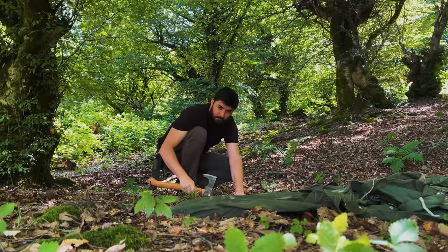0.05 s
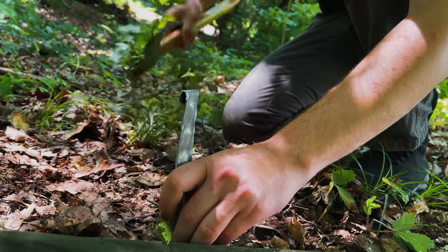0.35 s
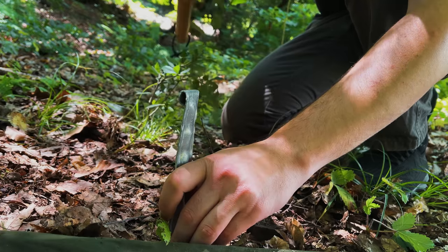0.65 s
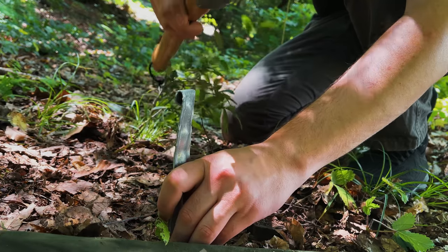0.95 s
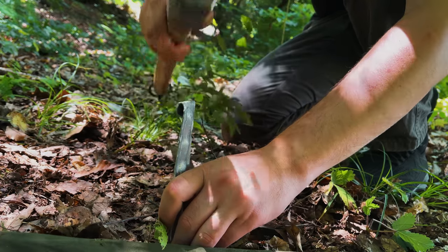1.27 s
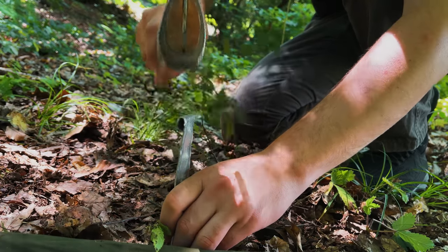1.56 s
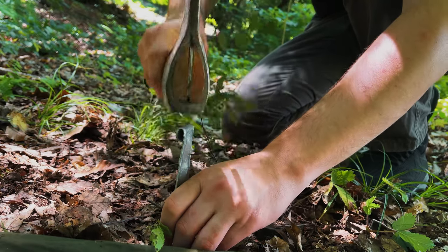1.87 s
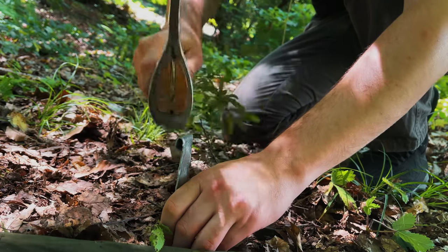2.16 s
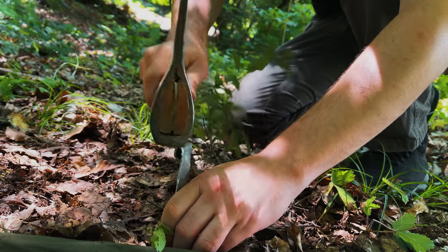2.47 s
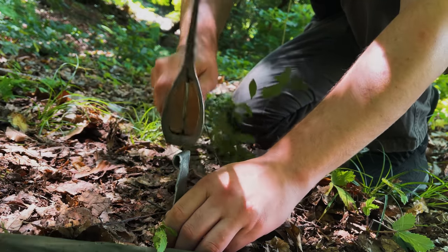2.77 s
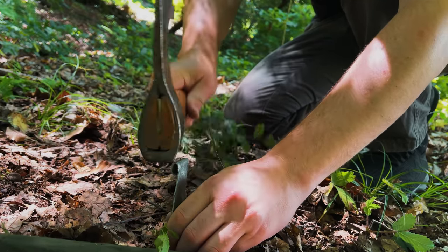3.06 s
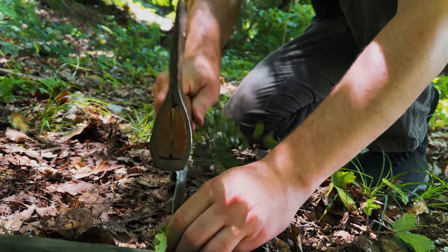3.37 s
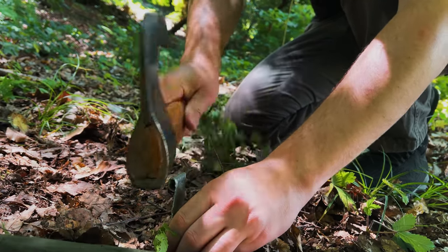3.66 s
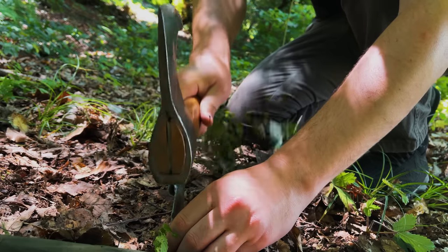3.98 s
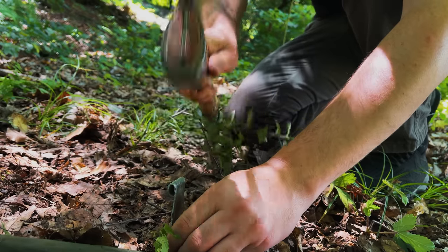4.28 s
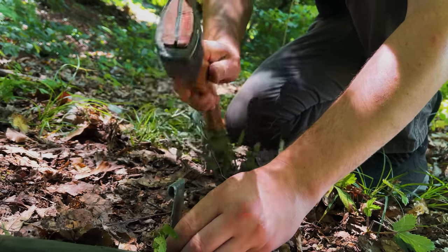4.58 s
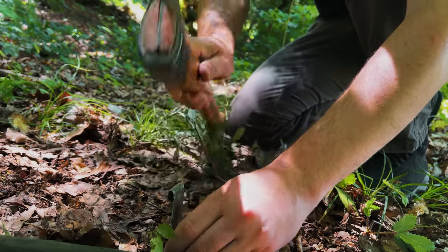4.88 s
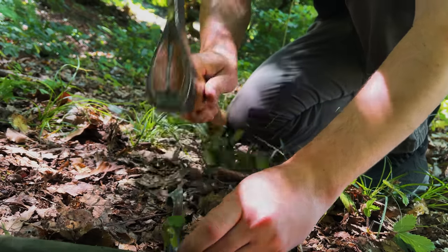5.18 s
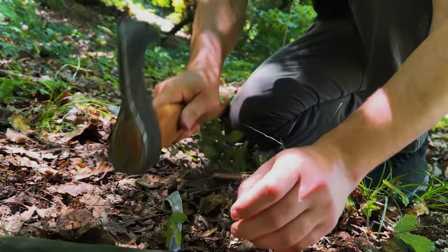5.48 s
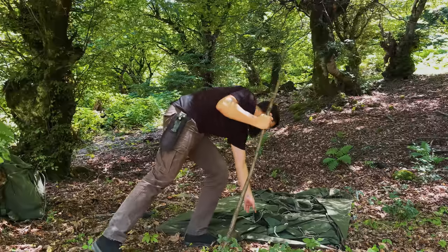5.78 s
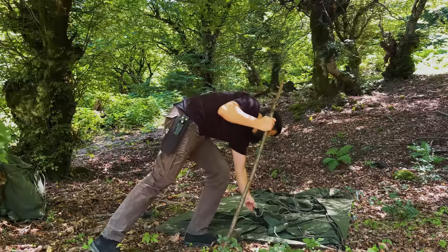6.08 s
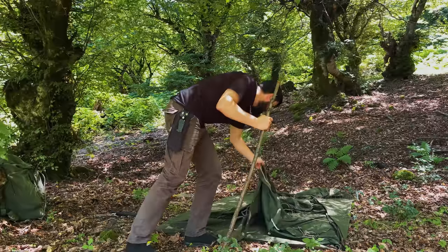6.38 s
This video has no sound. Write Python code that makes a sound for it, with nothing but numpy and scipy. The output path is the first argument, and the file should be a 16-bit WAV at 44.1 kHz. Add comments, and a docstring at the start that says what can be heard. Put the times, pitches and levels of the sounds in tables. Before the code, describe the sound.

An axe hammers a steel tent stake into soil with sharp clinks and thuds, amid droning cicadas and faint forest birds.

```python
"""Cicadas drone in a forest, a far bird whistles and dry leaves crackle. From 1.1 s the back of an axe drives a
steel tent stake into the soil with fourteen quick blows, each a bright clink and a falling thud. The background
dips after each blow, deeply at first. As the stake sinks the ground booms more, and the axe sometimes lands
twice. With the last blow, at 5.3 s, the background drone jumps louder; more birds call, and at the end a tarp
is dragged up, rustling and snapping."""
import sys
import numpy as np
from scipy import signal
from scipy.fft import rfft, irfft
from scipy.io import wavfile
from scipy.ndimage import uniform_filter1d

SR = 44100
rng = np.random.default_rng(int(sys.argv[2]) if len(sys.argv) > 2 else 0)


def unload_audio(sound):
    """Save the sound as a 16-bit wav file, at the path given as the first command line argument."""
    columns = np.transpose(np.atleast_2d(sound))
    # keep every value between -1 and 1, then stretch to whole-number steps
    steps = np.round(np.clip(columns, -1, 1) * 32767)
    wavfile.write(sys.argv[1], SR, steps.astype(np.int16))


N = 292824
HZ = np.fft.rfftfreq(4096, 1 / SR)

# Axe blows. Each row: start in seconds, then strike, thud and stake ring levels in dB.
BLOWS = [(1.1378, -20, -9, -54), (1.483, -19.5, -34, -56.5), (1.8099, -20.5, -27.5, -61),
         (2.12, -20.5, -25, -70), (2.443, -19.5, -22.5, -39), (2.761, -19, -20.5, -52),
         (3.0614, -21.5, -23, -51), (3.361, -19, -21.5, -40), (3.6543, -16.5, -19, -30.5),
         (3.958, -18, -21, -41.5), (4.4094, -20.5, -20.5, -35), (4.7303, -17, -19, -31.5),
         (5.055, -21, -20.5, -36.5), (5.3455, -22.5, -19, -30)]
# Light touches of axe on stake. Each row: start in seconds, level in dB.
TAPS = [(1.87, -41), (2.31, -53.5), (3.409, -31), (3.543, -43.5), (4.004, -31.5), (4.786, -31.5),
        (5.006, -45.5), (5.104, -30.5)]
# Steel-on-steel spectrum. Each row: frequency in Hz, relative level in dB.
CLINK_SPECTRUM = [(3000, -25), (8500, -11.5), (9100, -10), (9800, 7), (10200, -17), (10700, -1),
                  (11400, -3.5), (12500, -15.5), (13900, -21.5), (14400, -47), (15100, -13.5), (15700, -25),
                  (16300, -26.5)]
# Axe head modes. Each row: frequency in Hz, level re the strike in dB, T60 in seconds.
AXE_MODES = [(1980, -30.5, .13), (2550, -29, .05), (9815, -22, .17)]
# Modes of the hand-damped stake. Each row: frequency in Hz, relative level in dB, T60 in seconds.
STAKE_MODES = [(4260, -14, .11), (4640, -2, .065), (7612, 1.5, .09), (9040, -4, .08), (11910, -4, .08)]

def steel():
    """Axe on stake: a crack, a clink and a short ring for each blow; light taps only click."""
    out = np.zeros(N)
    bright = causal(amp(spectrum_at(CLINK_SPECTRUM, HZ)))
    for s, strike_db, _, ring_db in BLOWS:
        tall = 1 - ease(s, half_s=1.67, spread_s=0.11)  # 1 while the stake stands tall
        half_sunk = np.sin(np.pi * grip(s))
        crack_db = strike_db + between((-12, -11), tall) + 5.5 * half_sunk
        add(out, s, amp(crack_db) * contact(body_colour(tall), chatter=1.0))
        add(out, s - .0002, amp(strike_db) * contact(bright, chatter=0.27))
        add(out, s, amp(strike_db - 10.5 * tall) * ringing(AXE_MODES))
        add(out, s, amp(ring_db) * ringing(STAKE_MODES))
    dull = causal(HZ / (HZ + 200) / (1 + HZ / 2500) / (1 + (HZ / 4400) ** 10))
    for s, db in TAPS:
        add(out, s, amp(db - 14) * contact(dull, chatter=0.38, chatter_s=0.0035))
    return out

# Head and stake resonances. Each row: centre in Hz, width in Hz, level in dB, extra dB when tall.
BODY_RESONANCES = [(1420, 400, 0, -3), (2050, 220, -5, 2), (2570, 260, -1, 0), (2930, 320, -2, 3),
                   (3800, 450, -6, 3), (4720, 260, -1, 17), (6100, 550, 1, 11), (7650, 300, 2, 6),
                   (8150, 350, -2, 6)]

def body_colour(tall):
    """Impulse response of head and stake: broad resonances with hollows between them."""
    modes = sum(amp(db + tall * extra_db) / (1 + 2j * (HZ - hz) / width_hz)
                for hz, width_hz, db, extra_db in BODY_RESONANCES)
    hollows = amp(-8 - 4 * tall)
    return causal(abs(modes + hollows) * HZ / (HZ + 700) / (1 + (HZ / 9000) ** 14))

def contact(colour, chatter, rise_s=0.00055, chatter_s=0.0054):
    """One sharp contact and a few milliseconds of chatter, through the impulse response colour."""
    t = np.arange(512) / SR
    force = t / rise_s * np.exp(1 - t / rise_s)
    force += chatter * np.exp(-(t / chatter_s) ** 4) * np.minimum(t / rise_s, 1)
    grit = rfft(force * rng.standard_normal(len(t)))
    grit /= np.sqrt(abs(grit) + 1e-9)  # a hard contact excites all pitches nearly alike
    hit = signal.fftconvolve(irfft(grit) * np.exp(-(t / (2 * chatter_s)) ** 4), colour)
    return hit / np.sqrt(np.sum(hit ** 2) / (.01 * SR) + 1e-20)  # energy of 10 ms at rms 1

def ringing(modes):
    """Dying sines; each blow lands a little differently and shares its energy anew."""
    t = np.arange(SR // 4) / SR
    return sum(amp(db + rng.uniform(-3, 3) - 60 * t / t60_s) * np.sin(2 * np.pi * hz * t)
               for hz, db, t60_s in modes)

# Soft thumps on the soil. Each row: start in seconds, level in dB.
THUMPS = [(0.163, -50), (0.271, -53), (1.836, -34.5), (5.69, -37), (6.061, -39.5), (6.278, -47),
          (6.419, -36)]

def soil():
    """Each blow gives a thud, a short low knock of the soil and a boom; taps and thumps are softer."""
    out, t = np.zeros(N), np.arange(SR // 5) / SR
    thud_lag_s, soil_knock_lag_s, boom_lag_s = .0016, .0071, .0145
    soil_knock = (1 - np.exp(-t / 0.0047)) * np.exp(-t / 0.0069) * np.sin(2 * np.pi * 205 * t)
    for s, _, thud_db, _ in BLOWS:
        firm = grip(s)
        boom_db, ground_hz = between((-44, -15), firm), between((63.2, 75.4), firm ** 2)
        start_hz = 412 - 6.5 * (thud_db + 15.5)  # a harder shove starts lower
        decay_s = between((0.0067, 0.023), firm)
        add(out, s + thud_lag_s, thud(t, amp(thud_db), start_hz, decay_s))
        add(out, s + soil_knock_lag_s, amp(boom_db - 8.5) * soil_knock)
        add(out, s + boom_lag_s, amp(boom_db) * boom(t, ground_hz, swell_s=0.01))
    for s, db in TAPS:
        add(out, s + thud_lag_s, thud(t, amp(db - 1.5), start_hz=395, decay_s=0.0072))
        boom_db = -31.5 + 2 * (db + 32)  # light taps barely move the ground
        add(out, s, amp(boom_db) * boom(t, hz=83.3, swell_s=0.016))
    for s, db in THUMPS:
        add(out, s, amp(db) * boom(t, hz=88 * rng.uniform(0.82, 1.23), swell_s=.011))
    return out

def thud(t, force, start_hz, decay_s, rest_hz=72, fall_s=.004):
    """A push that falls in pitch as the soil yields; a hard one crushes it and adds an overtone."""
    phase = 2 * np.pi * np.cumsum(rest_hz + (start_hz - rest_hz) * np.exp(-t / fall_s)) / SR
    crush = force * 1.5 * np.exp(-t / 0.0029 - (t / 0.0059) ** 2) * np.cos(2 * phase)
    return -force * (1 - np.exp(-t / 0.0016)) * (np.exp(-t / decay_s) * np.sin(phase) + crush)

def boom(t, hz, swell_s):
    """The springy soil's vibration swells and dies within a few cycles."""
    envelope = t / swell_s * np.exp(1 - t / swell_s - (t / 0.043) ** 4)
    return envelope * np.sin(2 * np.pi * hz * t)

def grip(s):
    """The soil's hold on the stake at time s, from 0 (loose) to 1 (firm)."""
    return ease(s, half_s=2.59, spread_s=0.57)

def knocks():
    """The deeper the stake, the more of each blow the ground returns as a dull stereo knock."""
    out = np.zeros((2, N))
    colour = causal(1 / (1 + (480 / (HZ + 1)) ** 3) / (1 + (HZ / 1150) ** 6))
    for s, *_ in BLOWS:
        gain = amp(between((-64, -36.5), grip(s)))
        for channel in out:
            add(channel, s + 0.00033, gain * contact(colour, chatter=0.65, chatter_s=0.0061))
    return out * amp([[-1.5], [1.5]])

# Handled leaves and cloth. Each row: start and length in seconds, level in dB, brightness in Hz.
RUSTLES = [(0.194, 0.029, -63.5, 1600), (0.365, 0.18, -62, 9200), (0.41, 0.074, -49.5, 15000),
           (4.625, 0.23, -66, 3470), (5.614, 0.14, -65, 1500), (6.301, 0.42, -59.5, 1120)]

def rustles(clicks_per_s=420):
    """Leaves and cloth crackle in clumps of tiny clicks; each downswing also stirs the leaves."""
    out = np.zeros(N)
    lead_s, swing_s, swing_hz = .135, 0.096, 3140
    swings = [(s - lead_s, swing_s, between((-77, -75), grip(s)), swing_hz) for s, *_ in BLOWS]
    for s, length_s, db, bright_hz in RUSTLES + swings:
        count = round(length_s * SR)
        sizes = amp(5.2 * np.minimum(rng.exponential(1, count), 3.5)) * rng.choice([-1, 1], count)
        clicks = sizes * (rng.random(count) < clicks_per_s / SR) * signal.windows.tukey(count, .7)
        band = HZ / (HZ + bright_hz / 8) / (1 + (HZ / bright_hz) ** 2)
        colour = causal(band / (1 + (HZ / 13500) ** 12))
        add(out, s, amp(db) * unit_rms(signal.fftconvolve(clicks, colour)[:count]))
    return out

# Tarp snaps. Each row: start in seconds, level in dB.
TARP_SNAPS = [(6.36, -35.5), (6.405, -38), (6.442, -41), (6.554, -49)]

def tarp():
    """The tarp snaps dully as it is lifted."""
    out = np.zeros(N)
    cloth = causal(HZ / (HZ + 120) / (1 + (HZ / 1900) ** 3))
    for s, db in TARP_SNAPS:
        add(out, s, amp(db - 10) * contact(cloth, chatter=1.0))
    return out

# Far whistles. Each row: start and length in seconds, start, middle and end pitch in Hz, level in dB.
WHISTLES = [(0.032, 0.2, 2063, 1980, 1910, -69), (2.948, 0.15, 2530, 2426, 2430, -73),
            (3.778, 0.187, 2445, 2320, 2400, -73), (5.359, 0.044, 2780, 2820, 2740, -61.5),
            (5.639, 0.039, 2450, 2746, 2660, -59), (5.762, 0.056, 2870, 3090, 3020, -62),
            (5.958, 0.12, 3650, 3950, 3800, -62), (6.026, .22, 2136, 1956, 1890, -56.5),
            (6.172, 0.064, 3600, 3440, 3000, -61.5), (6.417, 0.055, 2674, 2840, 3000, -61.5),
            (6.575, 0.04, 1930, 2037, 2090, -55.5)]

def birds(trill_hz=37.9):
    """Each whistle glides through three pitches and flutters on its way through the trees."""
    out = np.zeros(N)
    for s, length_s, *pitches_hz, db in WHISTLES:
        progress = np.linspace(0, 1, round(length_s * SR))
        trill = np.sin(2 * np.pi * (trill_hz * length_s * progress + rng.random()))
        wander = unit_rms(uniform_filter1d(rng.standard_normal(len(progress)), size=200))
        hz = np.polyval(np.polyfit([0, .5, 1], pitches_hz, 2), progress)
        hz *= 1 + 0.021 * trill + .016 * wander
        swell = np.sin(np.pi * progress).clip(0) ** .5 * (1 + 0.38 * trill)
        add(out, s, amp(db) * swell * np.sin(2 * np.pi * np.cumsum(hz) / SR))
    return out

# Forest reverberation. Each row: frequency in Hz, T60 in seconds.
FOREST_DECAY = [(100, 0.22), (500, 0.3), (2000, 0.19), (6000, 0.39), (10000, 0.22), (16000, 0.04)]

def forest_echo(x):
    """Trunks and leaves scatter the sound back; the top treble dies first."""
    hz, t, noise = signal.stft(rng.standard_normal((2, SR // 2)), SR, nperseg=256)
    decay = amp(-60 * t / spectrum_at(FOREST_DECAY, hz)[:, None])
    onset = np.minimum(t / 0.0053, 1)
    tail = signal.istft(stereo_pair(*noise, hz) * decay * onset, SR, nperseg=256)[1]
    return signal.fftconvolve(x[None], tail / np.linalg.norm(tail[0]), axes=1)[:, :N]

# Chorus spectrum. Each row: frequency in Hz, relative level in dB.
CICADA_SPECTRUM = [(3000, -51), (4400, -27.5), (5200, -20), (5900, -5), (6500, 0.2), (7100, -7.5),
                   (7600, -0.6), (8300, -1), (9300, -7.5), (10500, -27.5), (11500, -29.5), (12400, -55),
                   (13500, -66)]
# Chorus loudness. Each row: time in seconds, level in dB.
CICADA_LEVEL = [(0, -39.5), (0.2, -37), (1.79, -37.5), (2.0, -43.5), (2.5, -47), (3.3, -45.5), (4.6, -44),
                (5.13, -44), (5.35, -30), (5.8, -28), (6.62, -28)]
# Chorus balance. Each row: frequency in Hz, left minus right in dB.
CICADA_PAN = [(4000, 6), (5800, 8.6), (6600, 6.5), (7600, 4.8), (8500, 0.5), (9300, 1), (14000, 0.5)]
# Faint high hiss around 10 kHz. Each row: frequency in Hz, relative level in dB.
HISS_SPECTRUM = [(5000, -33.5), (8500, -36.5), (9700, 18.5), (10600, -2), (11500, 6), (12500, -21),
                 (13500, -42)]

def cicadas(dip_db):
    """The chorus drones as bands of noise; a high hiss follows its level at half the swing in dB."""
    drone = envelope_of(CICADA_LEVEL) * amp(-dip_db)
    chorus = pan(diffuse(CICADA_SPECTRUM, patchy_db=1.74), CICADA_PAN)
    hiss = diffuse(HISS_SPECTRUM, patchy_db=3)
    return amp(-3.5) * drone * chorus + amp(-33) * drone ** .5 * hiss

# Air spectrum. Each row: frequency in Hz, relative level in dB.
AIR_SPECTRUM = [(15, -37), (25, 3.5), (81, -8.5), (166, -14), (450, -21.5), (524, -23), (710, -25.5),
                (1280, -24), (1450, -23.5), (2250, -25), (2670, -23), (3540, -25), (4500, -26.5),
                (5850, -42), (9900, -120)]
# Air loudness. Each row: time in seconds, level in dB.
AIR_LEVEL = [(0, -69.5), (0.42, -61.5), (0.75, -68.5), (1.75, -69), (2.3, -73), (3.62, -65), (4.2, -74),
             (4.6, -69.5), (5.15, -66), (5.55, -57.5), (5.9, -65.5), (6.45, -53.5)]

def air(dip_db):
    """Low rush of forest air, louder on the left."""
    gain = envelope_of(AIR_LEVEL) * amp(-0.86 * dip_db) * amp([[7], [4]])
    return gain * diffuse(AIR_SPECTRUM, patchy_db=2.0)

def background_dip_db():
    """The background sinks after each blow, holds and recovers: deeply at first, later slightly."""
    out, t = np.zeros(N), np.arange(N) / SR
    fall_s, hold_s, recover_s = .015, 0.055, 0.18
    for s, *_ in BLOWS:
        depth_db = between((21, 1), ease(s, half_s=1.84, spread_s=0.2))
        out += depth_db * np.minimum((t - s) / fall_s, 1 - (t - s - hold_s) / recover_s).clip(0, 1)
    return out

def diffuse(spectrum, patchy_db):
    """Stereo noise of a given spectrum, with drifting patches of loudness."""
    hz = np.fft.rfftfreq(1024, 1 / SR)
    a, b, c, d, patches = rng.standard_normal((N // 256 + 5, len(hz), 5)).T
    patches = unit_rms(uniform_filter1d(uniform_filter1d(patches, size=16, axis=0), size=8, axis=1))
    bins = stereo_pair(a + 1j * b, c + 1j * d, hz)
    bins *= amp(spectrum_at(spectrum, hz)[:, None] + patchy_db * patches)
    return unit_rms(signal.istft(bins, nperseg=1024, noverlap=768)[1][:, :N])

# How alike left and right sound. Each row: frequency in Hz, coherence from 0 to 1.
COHERENCE = [(40, 0.58), (300, 0.33), (700, 0.4), (3000, 0), (4500, 0), (6800, 1), (8000, 0), (9000, 1),
             (14000, 0.67)]

def stereo_pair(left, other, hz):
    """Blends two independent noise spectrograms into stereo, nearly mono in parts of the treble."""
    alike = spectrum_at(COHERENCE, hz)[:, None]
    return np.array([left, alike * left + np.sqrt(1 - alike ** 2) * other])

def pan(x, rows):
    """Places a sound by rows of frequency in Hz, left minus right in dB."""
    half_db = spectrum_at(rows, np.fft.rfftfreq(N, 1 / SR)) / 2
    return irfft(rfft(x) * amp([half_db, -half_db]), N)

def causal(gain):
    """Minimum-phase impulse response with this gain over HZ."""
    log_gain = np.log(np.maximum(np.r_[gain, gain[-2:0:-1]], 1e-5))
    return np.fft.ifft(np.exp(np.conj(signal.hilbert(log_gain)))).real

def spectrum_at(rows, hz):
    """Interpolates a table on a log-frequency axis."""
    row_hz, values = np.transpose(rows)
    return np.interp(np.log(hz + 1), np.log(row_hz + 1), values)

def envelope_of(rows):
    """Gain per sample from rows of seconds, dB."""
    return amp(np.interp(np.arange(N) / SR, *np.transpose(rows)))

def ease(s, half_s, spread_s):
    """Smooth step from 0 to 1 around half_s."""
    return .5 + .5 * np.tanh((s - half_s) / (2 * spread_s))

def between(ends, share):
    """Linear blend of two ends."""
    return ends[0] + (ends[1] - ends[0]) * share

def amp(db):
    """Decibels to gain."""
    return 10 ** (np.asarray(db) / 20)

def unit_rms(x):
    """Scales to rms 1."""
    return x / np.sqrt(np.mean(x ** 2) + 1e-20)

def add(mix, s, sound):
    """Adds a sound at s seconds."""
    part = mix[max(round(s * SR), 0):][:len(sound)]
    part += sound[:len(part)]

# Stereo phase. Each row: frequency in Hz, lead of the left channel in radians.
LEFT_LEAD = [(20, 0.5), (450, 0.5), (780, -1), (1380, -0.5), (1900, 4), (2900, 2), (3700, 5), (4500, 4.5),
             (6000, 9), (7500, 5.5), (8600, 8), (10200, 2), (12000, 1.5), (13700, -3.5), (15300, -11.5),
             (17000, -8.5)]

def scene():
    """Near blows and their echo over far birds, cicadas and air, in stereo."""
    metal, song, knock = steel(), birds(), knocks()
    near_pan = [(60, 1.5), (250, 2.5), (600, 0.5), (1400, 4.0), (2800, 13.5),
                (3800, 5.5), (6200, 8.5), (7700, 2.5), (8800, 1), (15000, -1.5)]
    near = pan(metal + soil() + rustles() + tarp(), near_pan)
    scattered = signal.lfilter(*signal.butter(6, 11500, fs=SR), metal + knock[0])  # leaves eat the top
    echo = pan(amp(-22.5) * forest_echo(scattered), [(1000, -4.5), (6500, 6.0), (9000, -3.5)])
    dip_db = background_dip_db()
    background = cicadas(dip_db) + air(dip_db)
    far_birds = amp(-1) * song + amp(5.5) * forest_echo(song)
    mix = near + knock + echo + background + far_birds
    lead_rad = spectrum_at(LEFT_LEAD, np.fft.rfftfreq(N, 1 / SR))
    return irfft(rfft(mix) * np.exp(.5j * np.array([lead_rad, -lead_rad])), N)

def record(dry):
    """Low cut at 32 Hz, soft limiting of the peaks, band limit at 16.6 kHz."""
    low_cut = signal.sosfiltfilt(signal.butter(2, 32, "high", fs=SR, output="sos"), dry)
    rounded = low_cut / (1 + (low_cut / .9) ** 6) ** (1 / 6)
    band_limit = signal.firwin(255, 16600, window=("kaiser", 9), fs=SR)
    return signal.oaconvolve(rounded, band_limit[None], "same")

dry = scene()
out = record(dry)
unload_audio(out)
```